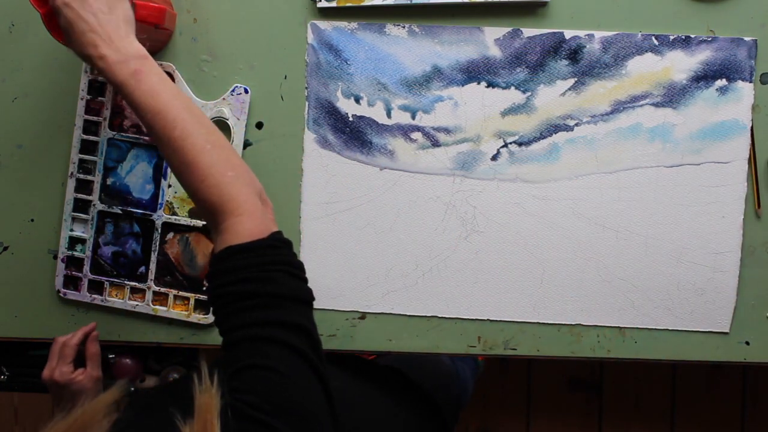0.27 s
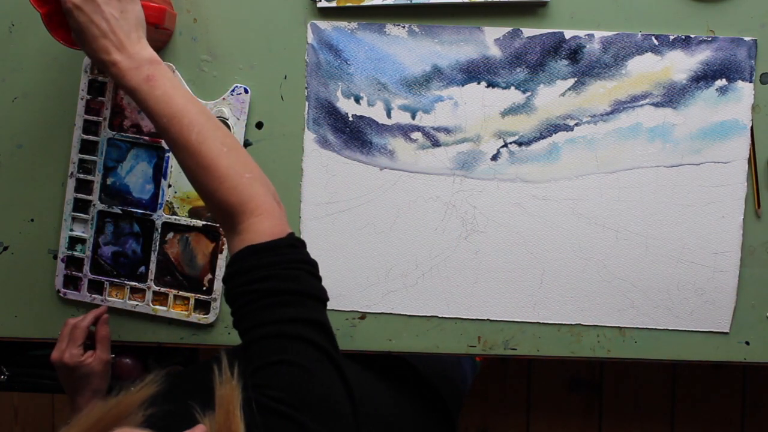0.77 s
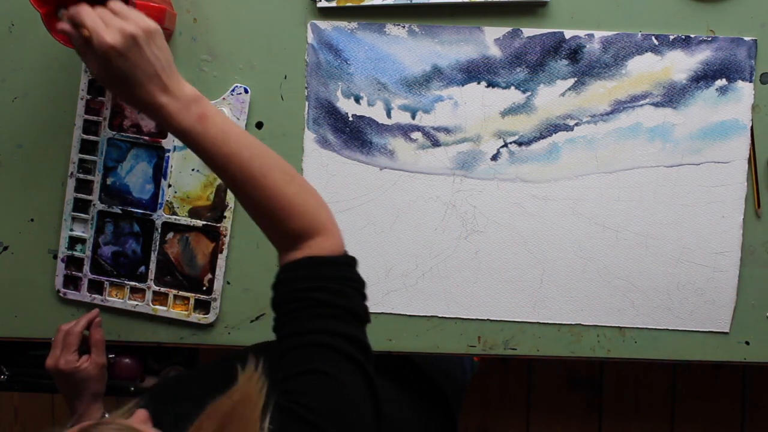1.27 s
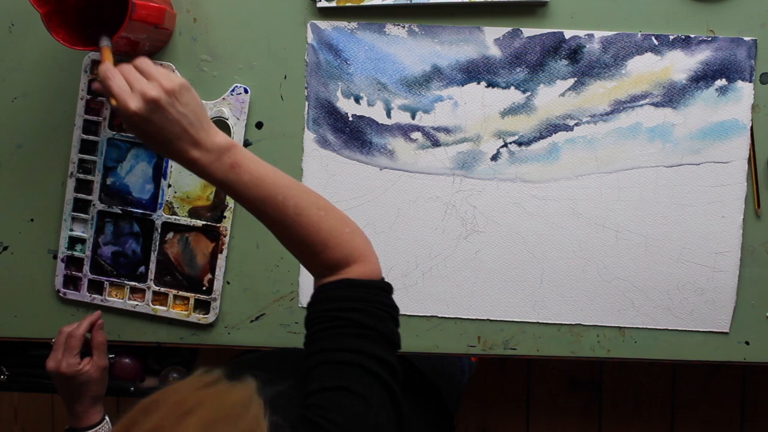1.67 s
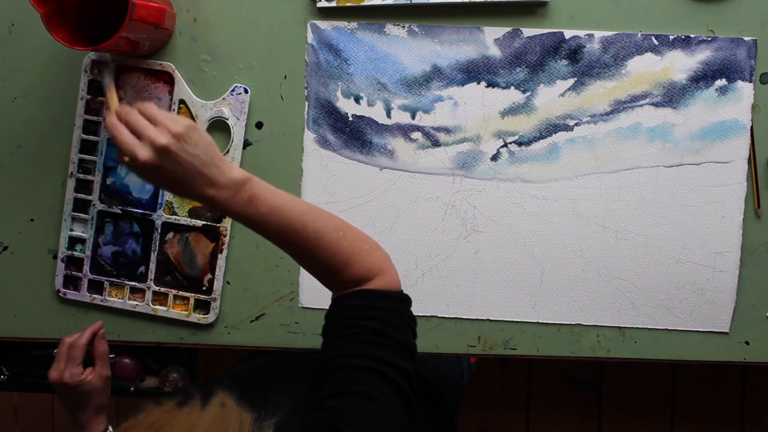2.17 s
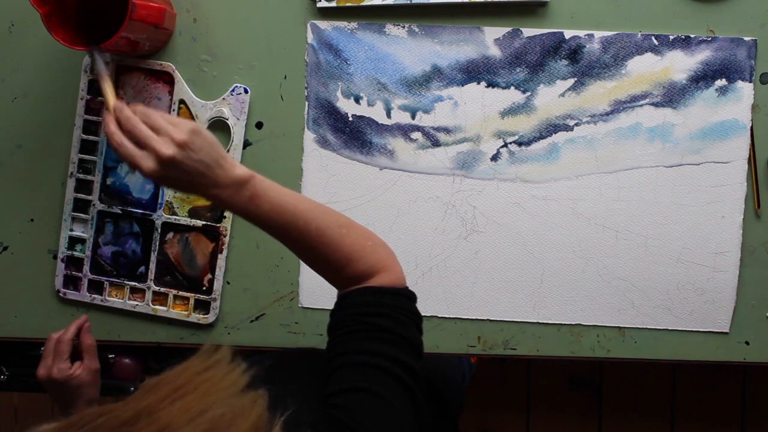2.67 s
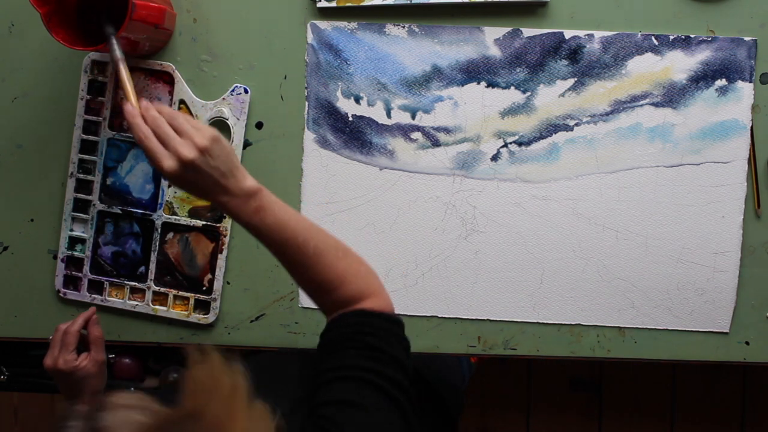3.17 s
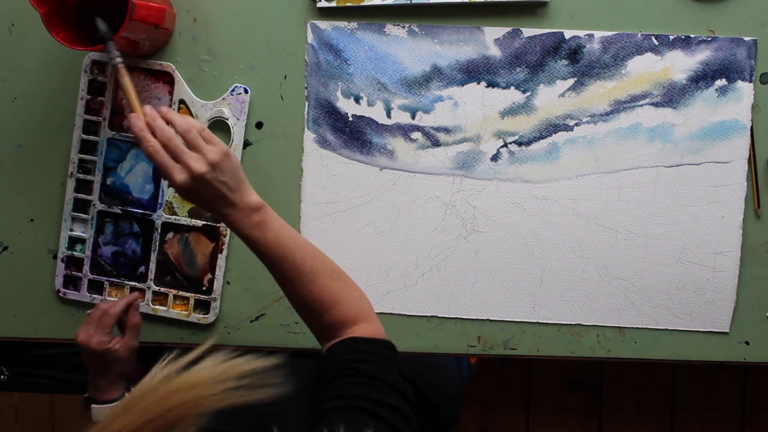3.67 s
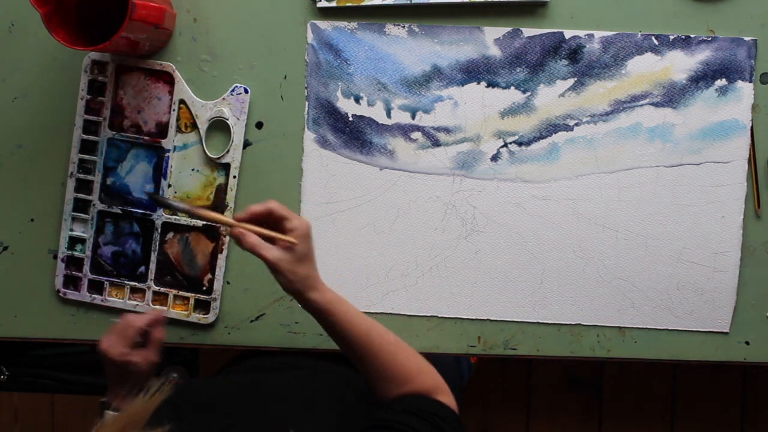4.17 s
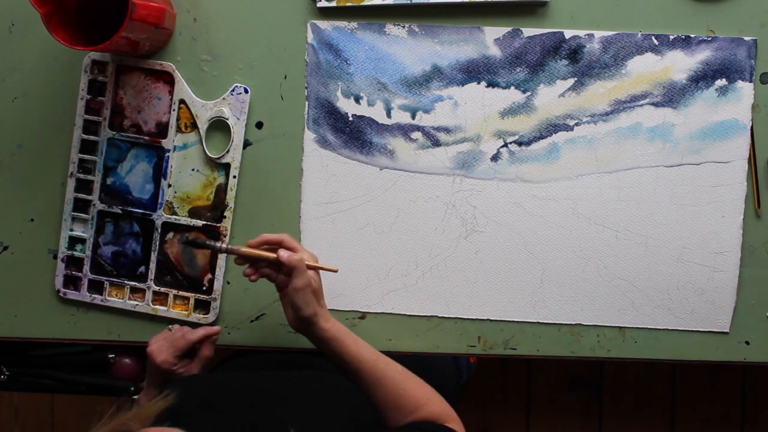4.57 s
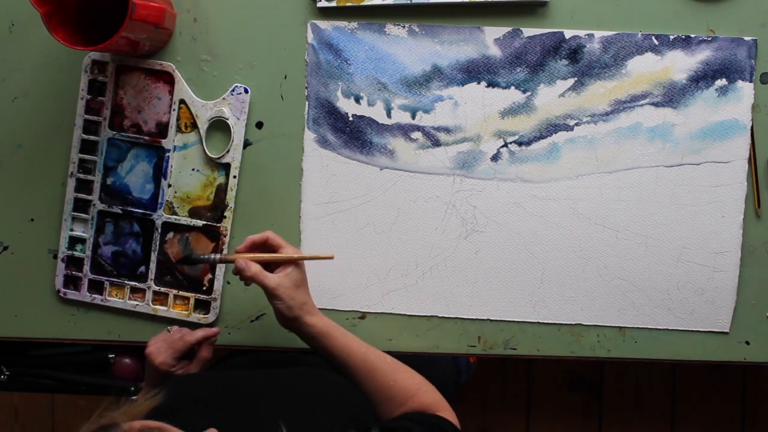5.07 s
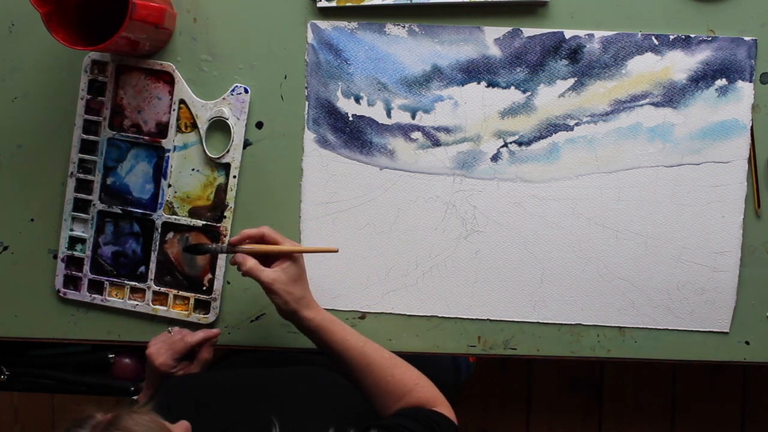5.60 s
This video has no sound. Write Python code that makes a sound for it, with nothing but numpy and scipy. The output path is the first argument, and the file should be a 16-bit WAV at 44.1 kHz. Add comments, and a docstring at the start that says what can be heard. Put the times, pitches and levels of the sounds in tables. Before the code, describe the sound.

A paintbrush churns in a plastic pot of water, sloshing, gurgling and bubbling. Its metal band clinks on the rim, the last bubbles pop, and wet bristles dab faintly. More clinks follow, with sharp taps and a wipe on a plastic palette and a soft sleeve rustle. The brush drags over paint and ends with a quick scrub. The table bumps softly throughout, heard close in a small room with a low hum.

```python
"""In a small room with a low hum, a paintbrush churns in a plastic pot: the water sloshes, gurgles and
bubbles. At about 1.3 s the metal ferrule clinks on the rim; as the last bubbles pop, wet bristles dab
in the wells of a plastic palette. After 3 s come more clinks, taps and a wipe, then a sleeve rustles.
Near 5 s the brush drags over a pan of paint, its ferrule singing, and ends with a quick scrub.
All along, the table rumbles and bumps softly under the arm."""
import sys
import numpy as np
from scipy import signal
from scipy.fft import rfft, irfft
from scipy.io import wavfile
from scipy.ndimage import uniform_filter1d

SR = 44100
rng = np.random.default_rng(int(sys.argv[2]) if len(sys.argv) > 2 else 0)


def generate_wav(signal):
    """Clip the signal to [-1, 1] and save it as 16-bit WAV at the path in sys.argv[1]."""
    frames = np.transpose(np.atleast_2d(signal))
    scaled = np.clip(frames, -1, 1) * 32767
    pcm = np.round(scaled).astype(np.int16)
    wavfile.write(sys.argv[1], SR, pcm)


N = 257544

# resonances of a palette well: f/Hz, width/Hz, lift/dB
WELL_RESONANCES = [(2140, 230, 6.5), (3090, 150, 8), (3420, 90, 1), (3940, 160, 8), (4460, 180, 4)]


def amp(db):
    """Decibels to gain."""
    return 10 ** (np.asarray(db) / 20)


def unit(x):
    """Scales to an rms of one."""
    return x / np.sqrt(np.mean(x ** 2) + 1e-20)


def read(points, hz):
    """Reads a curve along a log-frequency axis."""
    f, value = np.transpose(points)
    return np.interp(np.log(hz + 1), np.log(f + 1), value)


def add(mix, start, sound):
    """Lays a sound into the mix at start seconds."""
    part = mix[max(round(start * SR), 0):][:len(sound)]
    part += sound[:len(part)]


def decay(t, t60):
    """Falls by 60 dB every t60 seconds."""
    return np.exp(-np.log(1000) * t / max(t60, 1e-3))


def envelope(strokes, rise_s, t60, level_column=2):
    """Gain over a run of strokes: each swells, holds while the hand pushes, then dies away."""
    power = np.zeros(N)
    for stroke in strokes:
        start, push = stroke[:2]
        t = np.arange(N) / SR - start
        swell = np.sin(np.pi / 2 * np.clip(t / rise_s, 0, 1)) ** 2
        release = decay(np.maximum(t - push, 0), t60)
        power += (amp(stroke[level_column]) * swell * release) ** 2
    return np.sqrt(power)


def colour(x, eq, tilt_db=0, peaks=()):
    """Shapes x with an EQ curve, a tilt per octave above 500 Hz and resonant peaks; rms one."""
    hz = np.fft.rfftfreq(len(x), 1 / SR)
    db = read(eq, hz) + tilt_db * np.log2(np.maximum(hz, 500) / 500)
    for f, width, lift_db in peaks:
        db += lift_db / (1 + (2 * (hz - f) / width) ** 2)
    return unit(irfft(rfft(x) * amp(db), len(x)))


def wander(seconds):
    """A smooth random drift of rms one."""
    size = max(int(seconds * SR), 1)
    return unit(uniform_filter1d(uniform_filter1d(rng.standard_normal(N), size), size))


def flicker(x, depth_db=1.1):
    """Makes the spectrum flicker in small random patches, as things slip unevenly; rms one."""
    spectra = signal.stft(x, SR, nperseg=512, noverlap=384)[2]
    patches = uniform_filter1d(rng.standard_normal(spectra.shape), size=5, axis=0)
    patches = unit(uniform_filter1d(patches, size=9, axis=1))
    return unit(signal.istft(spectra * amp(depth_db * patches), SR, nperseg=512, noverlap=384)[1][:N])


def clicks(per_s, spread_db):
    """Random clicks; a positive spread makes a few louder, a negative one a few softer."""
    size = amp(spread_db * np.minimum(rng.exponential(1, N), 4))
    return size * rng.choice([-1, 1], N) * (rng.random(N) < per_s / SR)


def bursts(hits, eq, rise_s=0.00027):
    """Hits of coloured noise with a sharp attack."""
    out, t = np.zeros(N), np.arange(SR // 5) / SR
    for start, db, t60, tilt_db in hits:
        shape = decay(t, t60) * (1 - np.exp(-t / rise_s))
        add(out, start, amp(db) * shape * colour(rng.standard_normal(len(t)), eq, tilt_db))
    return out


def ping(hz, t60, glide, onset_cycles=1.0):
    """A damped sine climbing by glide octaves per t60, as a bubble does near the surface."""
    t = np.arange(int(max(t60, .002) * SR)) / SR
    phase = 2 * np.pi * np.cumsum(hz * 2 ** (glide * t / t60)) / SR
    return np.sin(phase) * decay(t, t60) * (1 - np.exp(-t * hz / onset_cycles))


def swarm(lo_hz, hi_hz, per_s, cycles, spread_db, sizes=36):
    """A cloud of bubbles of many sizes, each ringing for roughly so many cycles."""
    out = np.zeros(N)
    for hz in np.geomspace(lo_hz, hi_hz, sizes):
        bubble = ping(hz, t60=cycles / hz * rng.uniform(0.33, 1.4), glide=0.12)
        out += signal.oaconvolve(clicks(per_s / sizes, spread_db), bubble)[:N] * hz
    return unit(out)


def room(x, wet_db):
    """Adds dense reflections that die at their own speed in each band."""
    reverb_times = [(150, 0.16), (600, 0.55), (2500, 0.45), (6000, 0.45), (14000, 0.26)]  # small room: f/Hz, t60/s
    hz, t, spectra = signal.stft(rng.standard_normal(SR // 2), SR, nperseg=256)
    fade = np.exp(-np.log(1000) * t / read(reverb_times, hz)[:, None])
    tail = signal.istft(spectra * fade, SR, nperseg=256)[1]
    tail *= 1 - np.exp(-np.arange(len(tail)) / SR / 0.0016)  # reflections build up
    return x + amp(wet_db) * signal.fftconvolve(x, tail / np.linalg.norm(tail))[:N]


def room_tone():
    """A bed of still air and a low, wavering hum."""
    air_eq = [(15, -45), (25, -15), (40, -2), (60, 2.5), (90, -10), (130, -11.5), (200, -13.5),
              (400, -19.5), (750, -22), (1000, -20.5), (1800, -29), (4500, -31.5), (10400, -37),
              (12500, -35), (15500, -38.5)]  # room air: f/Hz, level/dB
    hum_tones = [(57, -65), (74, -63.5)]  # low hum: f/Hz, level/dB
    t = np.arange(N) / SR
    out = amp(-59.5) * colour(rng.standard_normal(N), air_eq)
    for hz, db in hum_tones:
        waver = amp(3 * wander(seconds=.3))
        phase = 2 * np.pi * hz * t + 0.44 * wander(seconds=0.076)
        out += amp(db) * waver * np.sqrt(2) * np.sin(phase)
    return out


def sleeve():
    """Soft, dull friction of cloth as the arm moves."""
    rustles = [(3.95, 0.49, -74), (4.38, 0.27, -70)]  # arm moves: t/s, push/s, level/dB
    cloth_eq = [(300, -16), (700, -3), (1200, 7), (2300, -1), (4000, -14), (8000, -34)]  # rubbing cloth: f/Hz, level/dB
    return envelope(rustles, rise_s=0.06, t60=.9) * flicker(colour(rng.standard_normal(N), cloth_eq))


def table():
    """The table top knocks dully, rumbles as the arm shoves it and gives soft, low bumps."""
    knocks = [(3.27, -52, 0.56, -0.5), (3.388, -53, .12, 2.5), (3.98, -61.5, 0.37, 0),
              (4.106, -54.5, 0.31, 3)]  # dull knocks: t/s, level/dB, t60/s, tilt/dB per octave
    wood_eq = [(150, -14), (300, 5), (600, -8), (900, -3.5), (1250, -10.5), (2000, -27), (5000, -28.5)]  # knocked table top: f/Hz, level/dB
    shoves = [(-.04, .1, -44.5), (.15, 0.096, -43), (.34, 0.24, -46), (.62, 0.093, -48.5),
              (.75, 0.091, -53), (.915, 0.075, -46.5), (1.09, 0.11, -52.5), (1.25, 0.082, -65),
              (1.63, 0.037, -58.5), (1.8, 0.09, -66.5), (2.66, 0.15, -61.5), (3.14, .08, -55.5),
              (3.27, 0.13, -52), (3.44, 0.079, -59), (3.84, 0.055, -64.5), (3.98, 0.19, -54),
              (4.36, 0.12, -66.5), (4.615, 0.044, -54.5), (4.74, 0.04, -53.5), (5.27, 0.22, -58.5)]  # shoves of the arm: t/s, push/s, level/dB
    rumble_eq = [(30, -17), (60, 2), (90, 5), (125, 5), (180, -4.5), (250, -13.5), (400, -12), (900, -23.5),
                 (1600, -28), (4000, -44.5)]  # shoved table: f/Hz, level/dB
    bumps = [(0.528, -51, 70, 0.11), (0.93, -33, 72, 0.14), (.946, -48, 106, 0.089),
             (1.513, -44.5, 42.3, 0.22), (3.167, -40, 95.7, 0.22), (3.296, -35.5, 102.6, 0.24),
             (3.32, -52, 134, .1), (3.39, -32, 104, 0.08), (4, -44, 115, 0.11), (4.064, -41.5, 94, 0.21),
             (4.164, -43.5, 90, 0.46), (4.632, -39, 79.3, 0.28), (4.769, -43, 77, .25),
             (5.455, -40.5, 85, 0.14)]  # soft bumps: t/s, level/dB, f/Hz, t60/s
    out = bursts(knocks, wood_eq)
    out += envelope(shoves, rise_s=0.025, t60=0.54) * colour(rng.standard_normal(N), rumble_eq)
    for start, db, hz, t60 in bumps:
        add(out, start, amp(db) * ping(hz, t60, glide=0, onset_cycles=0.45))
    return out


def palette_taps():
    """The brush strikes the plastic palette with short, bright clacks."""
    taps = [(3.3872, -39.5, 0.048, 1.2), (3.404, -50, 0.22, 1.5), (3.978, -59, 0.044, -7),
            (4.097, -51, 0.014, -2), (4.1035, -38.5, 0.021, -3), (4.958, -53.5, 0.045, 0),
            (5.585, -52, .03, -1)]  # brush taps: t/s, level/dB, t60/s, tilt/dB per octave
    plastic_eq = [(240, -31), (500, -27), (1000, -6), (1900, -2.5), (2600, -3), (3800, 3.5), (5200, -3.5),
                  (7000, -10), (9000, -11), (10600, -20), (15500, -25)]  # struck palette: f/Hz, level/dB
    return bursts(taps, plastic_eq)


def bristle_dabs():
    """Wet hairs slip and catch in tiny clicks, coloured by the well."""
    dabs = [(1.48, 0.22, -68), (1.76, 0.15, -71.5), (1.93, .09, -68), (2.12, 0.12, -75), (2.33, 0.07, -67),
            (2.675, 0.092, -67.5), (3.03, 0.09, -68.5)]  # soft dabs: t/s, push/s, level/dB
    dab_eq = [(800, -61), (1700, -10), (2400, -6), (3100, -2), (4400, -3.5), (5600, -3.5), (7500, -12),
              (15000, -12)]  # wet hairs: f/Hz, level/dB
    hairs = colour(clicks(6000, spread_db=4.5), dab_eq, peaks=WELL_RESONANCES)
    return envelope(dabs, rise_s=0.032, t60=0.42) * hairs


def bristle_wipe():
    """Hairs slip through the well in a fuller, smoother swish."""
    wipes = [(3.39, 0.078, -57.5), (3.47, 0.11, -50.5)]  # wiping strokes: t/s, push/s, level/dB
    wipe_eq = [(150, 2), (310, 3), (470, -10.5), (620, 2), (800, -10.5), (1200, -4.5), (1800, -8.5),
               (2800, -3), (3300, -4.5), (4000, -2.5), (5300, -7), (7000, -14), (9200, -10), (10600, -21),
               (13000, -14), (15500, -26)]  # sliding hairs: f/Hz, level/dB
    hairs = colour(clicks(7700, spread_db=1.5), wipe_eq)
    return envelope(wipes, rise_s=0.038, t60=.38) * flicker(hairs)


def bristle_drag():
    """Hairs and ferrule rub over a pan of paint; the damped metal sings."""
    drags = [(4.86, 0.055, -56.5), (4.945, 0.096, -55.5), (5.025, 0.086, -48), (5.14, 0.12, -49)]  # dragging strokes: t/s, push/s, level/dB
    drag_eq = [(700, -23), (1500, -7.5), (2800, -5.5), (5000, -8), (7800, -5), (9000, -1.5), (13500, -2.5),
               (15500, 3.5)]  # bright friction: f/Hz, level/dB
    singing = [(3130, 160, 6), (4250, 150, 6), (5900, 110, 8), (7150, 190, 11), (8420, 200, 3),
               (11540, 130, 10), (12900, 140, 8), (15500, 410, -4)]  # rubbed ferrule's resonances: f/Hz, width/Hz, lift/dB
    friction = colour(clicks(8000, spread_db=3.0), drag_eq, peaks=singing)
    return envelope(drags, rise_s=.03, t60=.38) * flicker(friction)


def bristle_scrub():
    """Hairs scrub quickly back, coloured by the well."""
    scrubs = [(5.495, .11, -51.5)]  # back stroke: t/s, push/s, level/dB
    scrub_eq = [(530, -36), (900, -13), (1350, -6), (1450, -14), (2280, -0.5), (2860, -5.5), (3850, -4),
                (4710, -9.5), (5240, -4), (6730, -7), (8440, -4.5), (10200, -9), (11600, -3), (15500, -7.5)]  # scrubbing hairs: f/Hz, level/dB
    hairs = colour(clicks(9000, spread_db=2.0), scrub_eq, peaks=WELL_RESONANCES)
    return envelope(scrubs, rise_s=0.032, t60=0.36) * flicker(hairs)


def ferrule_ring(t, place, ring_scale, chatter_hz=45):
    """One blow on the ferrule: the place of contact weights its modes, and chatter roughens them."""
    modes = [(4250, -19, -6.5, 0.17), (5400, -22, -27, 0.13), (6040, -15, 1, 0.31), (7130, -3, 4.5, 0.13),
             (7500, -28, -2, 0.075), (8720, -13, -22, 0.56), (9500, -17, -5, 0.13), (10200, -8, -25, .2),
             (11700, 5.5, -3, 0.26), (12500, -10.5, 3, 0.29), (16300, -13, -13, 0.16),
             (15700, -6, -11, 0.56)]  # metal modes: f/Hz, side-hit level/dB, lip-hit level/dB, t60/s
    hz, side_db, lip_db, t60s = np.transpose(modes)
    gains = amp(side_db + np.clip(place, 0, 1) * (lip_db - side_db))
    pole = np.exp(-2 * np.pi * chatter_hz / SR)
    chatter = unit(signal.lfilter([1], [1, -pole], rng.standard_normal((len(hz), len(t)))))
    phases = 2 * np.pi * hz[:, None] * t + .9 * chatter
    ring = sum(gain * np.sin(phase) * decay(t, t60 * ring_scale)
               for gain, phase, t60 in zip(gains, phases, t60s))
    return ring * np.sqrt(2) / np.linalg.norm(gains)


def ferrule_clinks():
    """Metal meets the rim: a bright contact tick and a thin ring."""
    # blows: t/s, level/dB, place (0 side, 1 lip), ring time factor, tick level/dB relative to the ring
    clinks = [(1.33, -65, .4, 0.22, 13.5), (1.3437, -50, 0.38, 0.24, 7), (1.5181, -40, 0, 0.28, -7),
              (1.525, -45.5, 0, 0.49, -4), (3.192, -67, 0.31, 0.56, 6), (3.218, -56, 0.96, 0.3, 2),
              (3.226, -51, 0, 0.26, -1), (4.838, -54, 1, 1, -8), (5.035, -50, 0.36, 0.94, -7),
              (5.146, -53, 0, 0.76, -7)]
    tick_eq = [(1000, -31), (3000, -9), (6000, -6), (9500, 1.5), (15500, 2.5)]  # metal on plastic: f/Hz, level/dB
    out, t = np.zeros(N), np.arange(SR // 2) / SR
    for start, db, place, ring_scale, tick_db in clinks:
        tick = colour(rng.standard_normal(len(t)), tick_eq) * decay(t, t60=0.045)
        add(out, start, amp(db) * (ferrule_ring(t, place, ring_scale) + amp(tick_db) * tick))
    return out


def wet_crack(hz, t60, rise_s=0.0012):
    """A bubble closes with a short splash of noise around its pitch."""
    t = np.arange(SR // 10) / SR
    band = [(hz / 4, -40), (hz / 1.3, -2), (hz * 1.3, -2), (hz * 2.5, -25), (hz * 6, -55)]
    return colour(rng.standard_normal(len(t)), band) * decay(t, t60) * (1 - np.exp(-t / rise_s))


def single_bubbles():
    """Bubbles and drops that stand out, each with a wet crack; the larger ring lower and longer."""
    bubbles = [(.008, 4700, -35, 0.46), (.013, 4190, -29.5, 0.12), (.039, 4500, -35, 0.3),
               (0.057, 1405, -34.5, 0.45), (.1232, 855, -21, 0.68), (.1355, 2213, -29, 0.33),
               (0.14, 3180, -26, 0), (0.144, 1310, -32, 0.25), (.157, 2320, -32, .3),
               (.205, 1423, -27.5, 0.42), (.21, 693, -27.5, 0), (.231, 1920, -32.5, .2),
               (.312, 2200, -35.5, 0), (0.3294, 2310, -33, .2), (0.373, 834, -27.5, 0.68),
               (0.382, 5700, -29, 1), (.396, 753, -33, 0.24), (.413, 715, -32, 0.02),
               (.447, 3940, -35.5, .04), (.476, 948, -30.5, 0.1), (.479, 692, -33.5, 0.25),
               (.482, 467, -38, .14), (.508, 2095, -34, .24), (.539, 2600, -35, 0), (.617, 667, -33.5, 0.3),
               (.63, 700, -33.5, 0.05), (.692, 1960, -31.5, 0), (.7817, 5390, -35.5, 0.43),
               (.841, 993, -37, 0.22), (0.979, 2290, -40, .3), (.982, 6460, -43, 0.6),
               (.994, 1210, -37.5, 0), (1.074, 1396, -33, 0.32), (1.108, 2100, -36, .17),
               (1.125, 5420, -42, 0.24), (1.127, 4210, -45, .2), (1.145, 2370, -38, .26),
               (1.161, 870, -34.5, 0.25), (1.319, 980, -41.5, 0.43), (1.854, 7050, -44, 0.8),
               (1.904, 2450, -41.5, .15), (1.91, 2350, -41, 0.2), (1.915, 13400, -42, .25),
               (2.307, 6100, -54, .24)]  # single plinks: t/s, f/Hz, level/dB, glide/octaves per t60
    out = np.zeros(N)
    for start, hz, db, glide in bubbles:
        t60 = 0.043 * (1000 / hz) ** 0.5
        add(out, start, amp(db) * ping(hz, t60, glide))
        add(out, start, amp(db - 8) * wet_crack(hz, min(t60, .024)))
    return out


def churned_water():
    """Large bubbles slosh and gurgle in the pot's cavity, small ones spray, and splashes snap."""
    sweeps = [(-.02, 0.048, -45, -46.5), (.135, 0.056, -41.5, -48), (.37, 0.036, -47.5, -54),
              (.472, 0.068, -47, -49), (.6, 0.083, -48.5, -51.5), (.8, 0.035, -60, -52.5),
              (.975, 0.022, -57, -58), (1.068, .09, -54, -53.5), (1.25, 0.11, -60.5, -79)]  # brush through water: t/s, push/s, slosh level/dB, spray level/dB
    slosh_eq = [(120, -26), (220, -23), (310, 2), (400, -15.5), (520, -3.5), (680, -3.5), (950, -0.5),
                (1400, -13.5), (2500, -27), (6000, -31)]  # body of the water: f/Hz, level/dB
    pot_resonances = [(692, 70, 6.5), (900, 39, -3), (1460, 110, -1), (2038, 260, 22)]  # air in the pot: f/Hz, width/Hz, lift/dB
    spray_eq = [(500, -25), (1100, 4), (2100, -0.5), (3200, -3.5), (4500, -7.5), (6000, -14.5), (8500, -20),
                (15000, -28.5)]  # fine spray: f/Hz, level/dB
    deep_strokes = [(.4, .25, -45.5)]  # brush low in the pot: t/s, push/s, level/dB
    gurgle_eq = [(120, -30), (240, 1), (300, -1.5), (390, 1.5), (470, -4), (580, -0.5), (720, -1.5),
                 (900, -16), (1500, -40)]  # deep gurgle: f/Hz, level/dB
    snaps = [(.008, -40.5, 0.081, 1), (.1355, -35.5, 0.094, 1.5), (.3295, -36.5, 0.042, 1.5),
             (.368, -36, 0.02, 6), (.375, -33.5, 0.03, 7.5), (.4745, -39.5, 0.072, 3), (.53, -41, 0.028, 9),
             (.603, -45, 0.11, 6), (.694, -44.5, 0.038, 5), (.9785, -43.5, 0.026, 10),
             (1.067, -54, .015, 10), (1.253, -53.5, 0.03, 6), (1.319, -44, 0.045, -14.5),
             (1.809, -54.5, .03, 10)]  # surface splashes: t/s, level/dB, t60/s, tilt/dB per octave
    slosh = swarm(248.7, 2517, per_s=600, cycles=26, spread_db=1.5) + 0.31 * rng.standard_normal(N)
    droplets = unit(clicks(2000, spread_db=5.0))
    spray = swarm(1117, 12660, per_s=1800, cycles=88, spread_db=4.5) + 0.34 * droplets
    gurgle = swarm(219, 825, per_s=160, cycles=14, spread_db=-3.0)
    # the water is thrown up fast and settles slowly
    out = envelope(sweeps, rise_s=0.015, t60=0.57) * colour(slosh, slosh_eq, peaks=pot_resonances)
    out += envelope(sweeps, rise_s=0.015, t60=0.49, level_column=3) * colour(spray, spray_eq)
    out += envelope(deep_strokes, rise_s=0.037, t60=0.15) * colour(gurgle, gurgle_eq)
    return out + single_bubbles() + bursts(snaps, spray_eq)


def scene():
    """Mono mix: pot, ferrule and palette with room reverb; table, room tone and sleeve dry."""
    pot = room(churned_water(), wet_db=-4.5)
    metal = room(ferrule_clinks(), wet_db=-3.0)
    taps = room(palette_taps(), wet_db=-7)
    bristles = room(bristle_dabs() + bristle_wipe() + bristle_drag() + bristle_scrub(), wet_db=-6.5)
    return (pot + metal + taps + bristles + table() + room_tone() + sleeve())[None]


def record(dry):
    """A steep low-pass trims the top above 15.8 kHz."""
    low_pass = signal.firwin(511, 15800, window=("kaiser", 9), fs=SR)
    return signal.oaconvolve(dry, low_pass[None], "same")


dry = scene()
out = record(dry)
generate_wav(out)
```